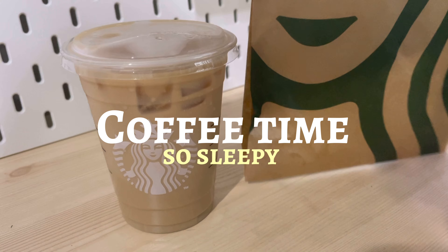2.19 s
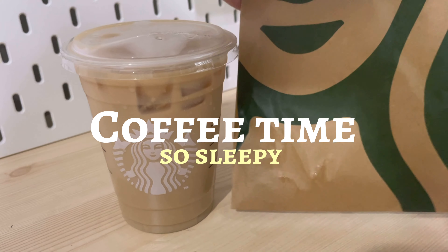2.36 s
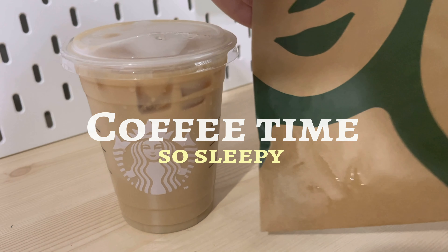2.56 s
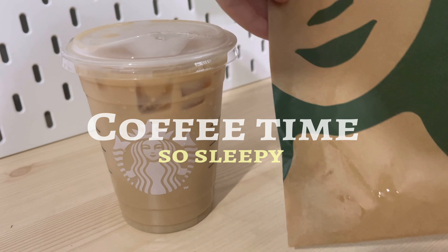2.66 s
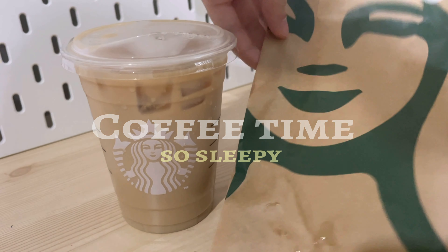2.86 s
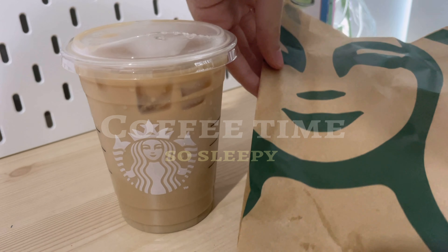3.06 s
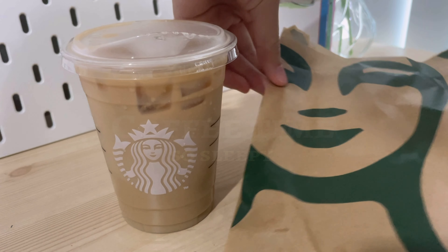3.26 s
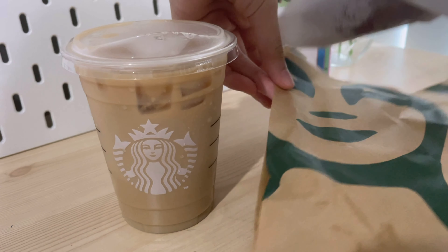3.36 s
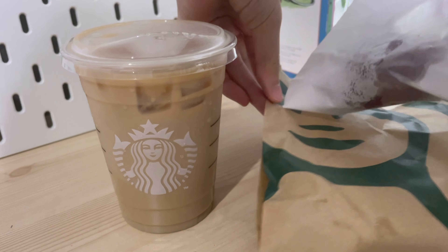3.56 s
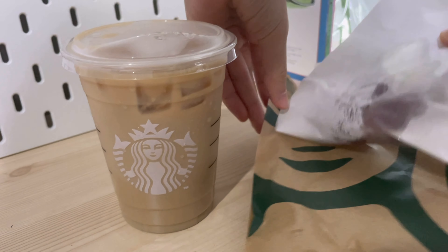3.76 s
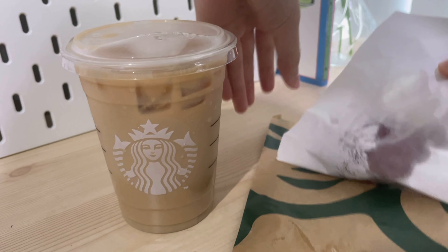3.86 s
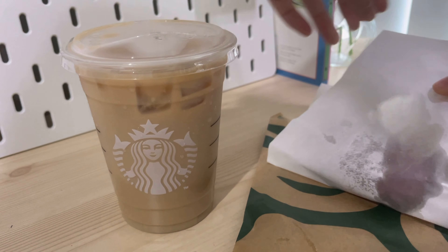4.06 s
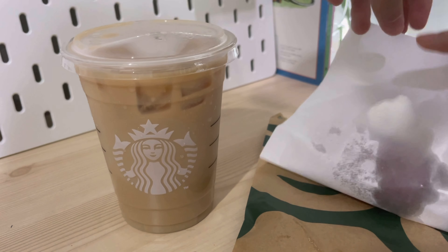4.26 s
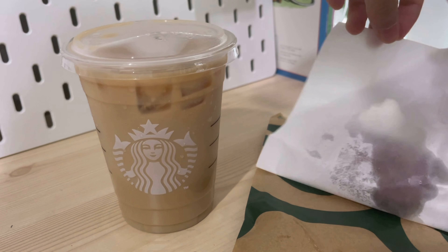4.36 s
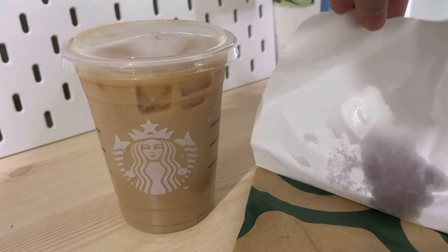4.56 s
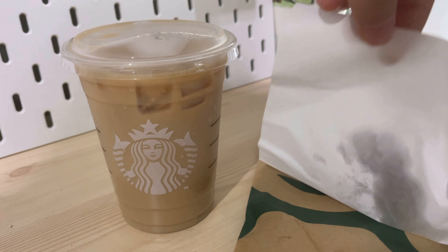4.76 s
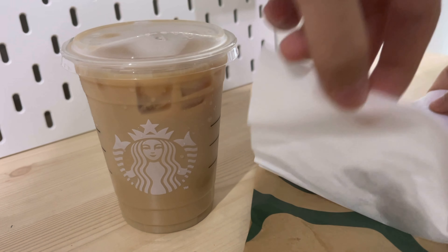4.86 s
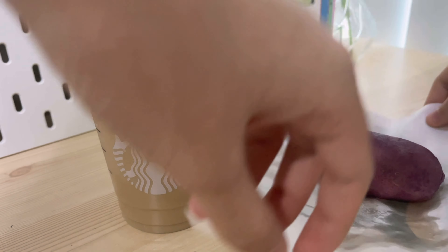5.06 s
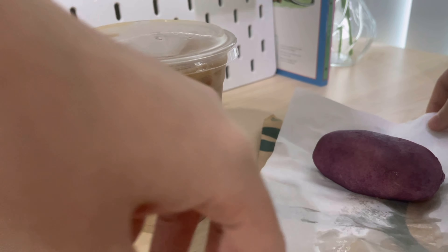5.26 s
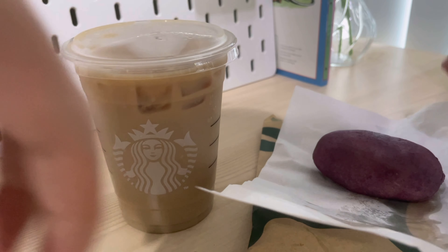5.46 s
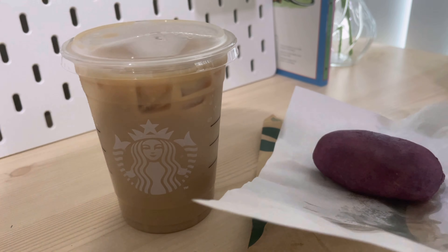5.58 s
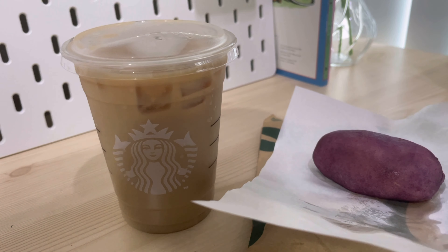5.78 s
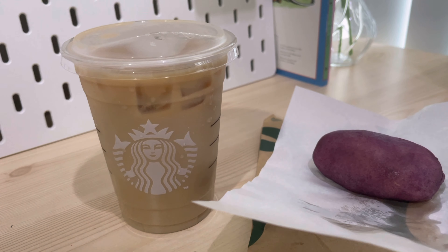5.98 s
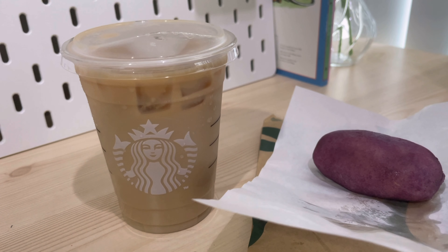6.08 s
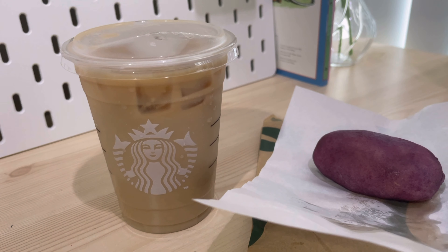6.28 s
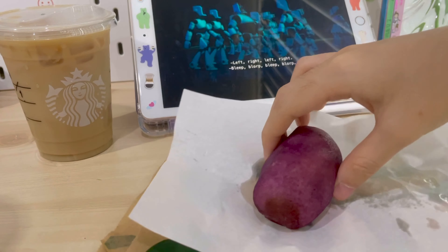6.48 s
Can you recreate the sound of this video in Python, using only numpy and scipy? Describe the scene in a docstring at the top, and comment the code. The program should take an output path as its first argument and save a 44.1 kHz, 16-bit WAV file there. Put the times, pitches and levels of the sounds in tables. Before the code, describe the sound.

A quiet indoor room with a low wavering hum, faint dull rustles and a small tap, dips briefly to silence. Then a paper bag and thin wrapper are handled on a wooden desk: dense sharp crackles, snapping creases and a few soft thumps. The handling turns lighter and patchier, then stops, leaving faint hush and a second tiny dip near the end. Very close stereo microphone, small dry room.

```python
"""Paper bag and wrapper on a desk

A paper bag and a thin wrapper are handled on a wooden desk, close to two microphone ports.
Creases snap, small folds ring and panels pop over a dense crackle of noise shaped by random buckles.
Soft sagging tones thump the desk, a wavering low tone hums and swells in it, short noise tails answer as a room.
A hush with duller swells of noise lies behind; the whole level dips to silence twice."""
import sys
import numpy as np
from scipy import signal
from scipy.fft import rfft, irfft, next_fast_len
from scipy.io import wavfile
from scipy.ndimage import uniform_filter1d, map_coordinates

SR = 44100
rng = np.random.default_rng(int(sys.argv[2]) if len(sys.argv) > 2 else 0)


def wav_out(sig):
    """Save sig, one row per channel (or a flat mono array), as 16-bit PCM at SR to the path in sys.argv[1]."""
    wavfile.write(sys.argv[1], SR, np.round(np.clip(np.atleast_2d(sig).T, -1, 1) * 32767).astype(np.int16))


N = 287513

# Colour of the bright paper crackle. Each row: frequency in Hz, relative level in dB.
CRACKLE_COLOUR = [(400, -31.5), (1000, -4), (2000, -1.5), (4500, -1), (6000, -6), (8000, -3), (11500, -6.5),
                  (14500, -7)]
# Colour of the duller flapping body of the sheet. Each row: frequency in Hz, relative level in dB.
BODY_COLOUR = [(35, -22.5), (70, 0.5), (120, 0), (330, 4), (520, 2), (620, -3), (950, 0), (2000, -21)]
# Dips to silence. Each row: middle in seconds, silence on each side of it in seconds.
DIPS = [(0.898, 0.0087), (6.428, 0.0078)]


def amp(db):
    """dB to gain."""
    return 10 ** (np.asarray(db) / 20)


def unit(x):
    """Scaled to rms 1."""
    return x / np.sqrt(np.mean(x ** 2) + 1e-20)


def even(x):
    """x without its slow changes of level."""
    return x / np.sqrt(abs(uniform_filter1d(x ** 2, size=300)) + 1e-20)


def along(points, hz):
    """Values at hz, from (Hz, value) points joined on a log frequency axis."""
    f, v = np.transpose(points)
    return np.interp(np.log(hz + 1), np.log(f + 1), v)


def curves(rows):
    """One value per sample for each column after the time."""
    s, *cols = np.transpose(rows)
    return [np.interp(np.arange(N) / SR, s, c) for c in cols]


def wobble(rate):
    """A smooth random curve, rate knots a second."""
    knots = rng.standard_normal(int(N * rate / SR) + 4)
    return map_coordinates(knots, [np.arange(N) * rate / SR])


def filtered(x, response):
    """x times a complex response of frequency."""
    m = next_fast_len(N + SR // 2)
    spectrum = rfft(x, m) * response(np.fft.rfftfreq(m, 1 / SR))
    return irfft(spectrum, m)[..., :N]


def noise(colour, patchy_db):
    """Noise of rms 1 whose colour shifts at random in small patches of time and frequency."""
    z = signal.stft(rng.standard_normal(N), nperseg=256)[2]
    field = rng.standard_normal(z.shape)
    field = uniform_filter1d(field, size=7, axis=0)  # smooth over frequency
    field = uniform_filter1d(field, size=5, axis=1)  # smooth over time
    patchy = signal.istft(z * amp(patchy_db * unit(field)), nperseg=256)[1][:N]
    return unit(filtered(patchy, lambda hz: amp(along(colour, hz))))


def diffuse(colour):
    """Noise from all around: alike at both ports in the bass only."""
    # Each row: frequency in Hz, likeness of the two ports from 0 to 1.
    likeness = [(60, 1), (300, 0.3), (1400, 0)]

    def mid_side(hz):
        turn = np.arccos(np.clip(along(likeness, hz), -1, 1)) / 2
        return amp(along(colour, hz)) * [np.cos(turn), np.sin(turn)]

    mid, side = filtered(rng.standard_normal((2, N)), mid_side)
    return unit(np.array([mid + side, mid - side]))


def bursts(blows, rise, t60):
    """Envelope that climbs 60 dB in rise seconds to a peak just after every blow, then decays."""
    peak_s = 0.0012  # delay of the peak
    t = np.arange(-SR // 8, SR // 8) / SR - peak_s
    shape = amp(-60 * np.maximum(-t / rise, t / t60))
    return signal.fftconvolve(blows, shape, mode="same")


def swells(rows, rise_db_per_s, fall_db_per_s):
    """Gain of overlapping (start, held seconds, dB) swells: a rise up to the start, a hold, a fall."""
    t = np.arange(0, N, 32) / SR
    power = 0
    for s, held, db in rows:
        before, after = np.maximum(s - t, 0), np.maximum(t - s - abs(held), 0)
        power = power + amp(db - rise_db_per_s * before - fall_db_per_s * after) ** 2
    return np.interp(np.arange(N) / SR, t, np.sqrt(power))


def pings(s, db, hz, cycles):
    """Damped sines, one per entry, that lose 60 dB in so many cycles."""
    k = np.arange(SR // 30)
    turns = np.outer(hz, k / SR)
    decay = amp(np.asarray(db)[:, None] - 60 * turns / cycles)
    rings = decay * (1 - np.exp(-2 * turns)) * np.sin(2 * np.pi * turns)
    places = np.round(np.asarray(s) * SR).astype(int)[:, None] + k
    return np.bincount(places.ravel(), rings.ravel(), N + SR)[:N]


def rustle():
    """The moving sheet: crackle on a flickering hiss, ringing folds, and the duller flap of its body."""
    # How much the sheet flaps. Each row: time in seconds, body level in dB against the crackle.
    flap = [(1, -4), (2.8, -8.5), (3.2, -4.5), (3.9, -9), (4.3, 0.5), (5.2, -8.5)]
    folds_db = -10  # against the crackle
    buckles = unit(crackle(rate=380, spread_db=3.0, clump_db=1.0))
    bright_envelope = 0.59 * buckles + 0.6 * amp(1.5 * wobble(60))
    bright = unit(bright_envelope * noise(CRACKLE_COLOUR, patchy_db=2.5))
    body_envelope = 0.38 * buckles + 0.55 * amp(2.6 * wobble(25))
    body = unit(body_envelope * noise(BODY_COLOUR, patchy_db=3.0))
    return handling() * (bright + amp(folds_db) * folds() + amp(curves(flap)[0]) * body)


def handling():
    """Gain of the rustle: moves that begin before the first dip end there, later ones take over."""
    # Pulls and squeezes of the paper. Each row: start in seconds, held time in seconds, gain in dB.
    moves = [(0, 0.039, -76.5), (0, .85, -97.5), (.636, 0.0088, -83.5), (.96, 1.91, -51.5),
             (0.968, 0.01, -46.5), (1.07, 0.025, -53), (1.489, 0.008, -44.5), (1.62, 0.071, -46.5),
             (1.895, 0.17, -45.5), (2.191, 0.097, -46.5), (2.39, 0.12, -49), (2.89, 0.014, -57.5),
             (2.95, 0.029, -72.5), (3.07, 0.084, -69.5), (3.267, 0.025, -57.5), (3.39, 0.011, -65.5),
             (3.504, 0.18, -61.5), (3.75, 0.084, -65.5), (3.83, 0.19, -54.5), (3.905, 0.027, -51.5),
             (4.09, 0.066, -63), (4.25, 0.09, -69.5), (4.442, 0.028, -62.5), (4.65, 0.065, -61),
             (4.77, 0.17, -70.5), (4.92, 0.072, -64), (5.02, 0.036, -64.5), (5.14, 0.032, -61.5),
             (5.23, 0.036, -63.5), (5.33, 0.081, -67.5), (6.5, .03, -65)]
    grip_db_per_s, let_go_db_per_s = 261.5, 321.5  # speed of rise and fall
    turnover = DIPS[0][0]
    first = [row for row in moves if row[0] < turnover]
    later = [row for row in moves if row[0] >= turnover]
    first_gain = swells(first, grip_db_per_s, let_go_db_per_s)
    later_gain = swells(later, grip_db_per_s, let_go_db_per_s)
    return np.where(np.arange(N) / SR < turnover, first_gain, later_gain)


def crackle(rate, spread_db, clump_db):
    """Envelope of countless small buckles in clumps, a few much larger than the rest."""
    draw = rng.random((2, N))
    odds = rate / SR * amp(clump_db * wobble(35))
    blows = (draw[0] < odds) * amp(-spread_db * np.log(draw[1] + 0.007))
    return bursts(blows, rise=0.006, t60=0.014)


def folds():
    """Small folds flip at random moments and ring for a few cycles, each at its own pitch."""
    folds_per_s, middle_hz, spread_octaves = 220, 2970, 0.891
    draw = rng.random((2500, 2))
    s = np.cumsum(-np.log(1 - draw[:, 0])) / folds_per_s
    hz = middle_hz * 2 ** (spread_octaves * rng.standard_normal(len(s)))
    hz = np.clip(hz, 700, 12000)
    db = -3 * np.log(draw[:, 1] + 0.044)
    keep = s < N / SR
    return unit(pings(s[keep], db[keep], hz[keep], cycles=30))


def snaps():
    """Each buckle is a ragged burst with a weak after-crack: crack, air above it, a slower flap of the body."""
    # Creases that buckle one by one.
    # Each row: start in seconds, crack level in dB, air in dB against the crack before the air's own lift.
    creases = [(0.0458, -62, -4), (.578, -77.5, 0), (0.6298, -63, -0.5), (0.949, -51.5, 0.5),
               (1.0382, -33, 0), (1.059, -38, -12), (1.0782, -35, -0.5), (1.101, -45.5, -1),
               (1.115, -43, 4), (1.123, -37.5, 3.5), (1.148, -40, 1.5), (1.186, -46, -5), (1.197, -45, -3),
               (1.246, -44.5, -7), (1.3067, -40.5, -3), (1.319, -48, 5), (1.352, -39, -15), (1.41, -56, 10),
               (1.4342, -41.5, -9), (1.459, -46.5, 11.5), (1.5818, -45, -1.5), (1.7501, -32.5, -3.5),
               (1.762, -41, -3.5), (1.7726, -37.5, -1), (1.8304, -36.5, -1.5), (1.8803, -31.5, -3),
               (1.9074, -40, -4), (1.935, -46, 0), (1.955, -46.5, -16), (1.967, -42.5, 2.5),
               (1.989, -38, -7), (2.011, -37, 1), (2.0615, -45, -17), (2.0774, -48.5, -9), (2.109, -46, -2),
               (2.194, -44, -5.5), (2.214, -40.5, -3), (2.2638, -40, -7), (2.2997, -49.5, -2),
               (2.358, -46.5, 2.5), (2.3999, -44, -3), (2.4294, -45.5, -1), (2.4503, -56, 0.5),
               (2.4818, -50, -7), (2.4954, -43, -4.5), (2.5819, -40, 0), (2.592, -43.5, -1),
               (2.6449, -36.5, 1.5), (2.7318, -48.5, 10), (2.851, -41, -1.5), (2.878, -41, 3),
               (3.0451, -55, -27), (3.076, -49, -4), (3.1155, -51, -12), (3.2276, -54, 5), (3.309, -44, -7),
               (3.395, -53, -7), (3.412, -53, 1), (3.5023, -58, 0), (3.6351, -42.5, -4), (3.729, -50, -6.5),
               (3.741, -48.5, 0.5), (3.7757, -48, 8), (3.843, -36.5, 4.5), (3.8736, -45, 0),
               (3.9145, -42.5, -6.5), (3.9424, -40, -6), (3.997, -46.5, -1.5), (4.1148, -56, -2),
               (4.1504, -54, -19), (4.2432, -56, -5), (4.378, -56.5, -19), (4.415, -57.5, -3),
               (4.4704, -45, -1.5), (4.5593, -52.5, 0.5), (4.634, -66, 17), (4.647, -49.5, -25),
               (4.725, -46.5, 1), (4.7653, -54.5, -13), (4.791, -52, -3), (4.8524, -46, 2.5),
               (4.9505, -48, -3), (4.9674, -50, 8), (5.0163, -47, 4), (5.038, -47, -11), (5.074, -43.5, 6),
               (5.094, -57, 0), (5.134, -57, -17), (5.153, -51, -12), (5.185, -61, -2), (5.2499, -47.5, 1),
               (5.28, -59, 2), (5.294, -56.5, 3.5), (5.3664, -59.5, 8), (5.3984, -53, -8)]
    # Each row: frequency in Hz, relative level in dB.
    air_colour = [(5000, -36), (9000, -2.5), (11000, -0.5), (15000, -2.5)]
    after_s, after_db = 0.018, -13.5  # latest after-crack, its level against the snap
    air_lift_db, body_db = 1.5, -14.5
    blows = np.zeros((2, N))  # crack, air
    for (s, db, air_db), late in zip(creases, rng.random(len(creases))):
        for delay, drop_db in ((0, 0), (after_s * late, after_db)):
            blows[:, round((s + delay) * SR)] += amp(np.array([db, db + air_db]) + drop_db)
    ragged = unit(amp(2.4 * wobble(900)))
    crack_colour = CRACKLE_COLOUR[:5] + [(9000, -0.5), (12000, -20.5)]
    crack = bursts(blows[0], rise=0.0096, t60=0.025) * even(noise(crack_colour, patchy_db=3.2))
    air = bursts(blows[1], rise=0.003, t60=0.016) * even(noise(air_colour, patchy_db=2.0))
    body = bursts(blows[0], rise=0.035, t60=0.055) * noise(BODY_COLOUR, patchy_db=3.0)
    return ragged * (crack + amp(air_lift_db) * air) + amp(body_db) * body


def pops():
    """Panels of paper pop with a dull note, and one tap: each rings a close cluster around its pitch."""
    # Each row: start in seconds, level of each ring in dB, central pitch in Hz.
    panels = [(.09, -56, 855), (.175, -57, 1040), (.631, -52, 1414), (.972, -43.5, 1180), (3.228, -63, 660),
              (3.275, -60.5, 487), (3.29, -71, 880), (3.308, -53, 666), (3.383, -62.5, 597),
              (3.582, -52.5, 730)]
    s, db, hz = np.repeat(panels, 3, axis=0).T  # three rings a pop
    draw = rng.standard_normal((len(s), 2))
    return pings(s + 0.0016 * abs(draw[:, 0]), db, hz * (1 + 0.19 * draw[:, 1]), cycles=34)


def thumps():
    """A soft blow on the desk: a few low cycles whose pitch sags."""
    # Bag and food set down on the desk. Each row: start in seconds, level in dB before the lift,
    # pitch it settles to in Hz, starting pitch as a multiple of that.
    set_downs = [(1.508, -43, 343, 1.2), (1.992, -35, 303, 1.2), (2.871, -35.5, 100.5, 2.4),
                 (3.575, -40.5, 337, 1.3)]
    lift_db = 4.5
    out, t = np.zeros(N + SR), np.arange(SR // 5) / SR
    for s, db, hz, start in set_downs:
        cycles = np.cumsum(hz * (1 + (start - 1) * np.exp(-t / 0.00776))) / SR
        decay = amp(db + lift_db - 60 * cycles / 8)  # loses 60 dB in 8 cycles
        attack = 1 - np.exp(-t / 0.003)
        out[round(s * SR):][:len(t)] += decay * attack * np.sin(2 * np.pi * cycles)
    return out[:N]


def walls(x):
    """Echoes of the room and, shorter, of cup and desk: noise tails whose treble dies first."""
    # Each row: frequency in Hz, room decay by 60 dB in seconds (the second tail takes half).
    decay_times = [(100, 0.3), (1000, 0.17), (8000, 0.05)]
    out, step = np.zeros((2, N + SR)), SR // 5
    for start in range(0, N, step):  # the paper moves, so the tails are new every fifth of a second
        hz, t, z = signal.stft(rng.standard_normal((2, SR // 5)), SR, nperseg=128)
        t60 = along(decay_times, hz)[:, None] * [[[1]], [[.5]]]
        tail = signal.istft(z * amp(-60 * t / t60), SR, nperseg=128)[1]
        tail = tail / np.linalg.norm(tail, axis=1, keepdims=True)
        echo = signal.fftconvolve(x[None, start:start + step], tail, axes=1)
        out[:, start:start + echo.shape[1]] += echo
    return out[:, :N]


def ports(pair):
    """Near sound reaches the two ports with unequal strength and phase."""
    # Each row: frequency in Hz, left over right in dB.
    louder_left = [(380, -0.5), (700, 1.5), (5500, 2.5), (9000, 0)]
    # Each row: frequency in Hz, phase by which the left port leads in radians.
    phase_lead = [(2000, .1), (3400, .8), (4800, .7), (5500, 0), (6200, -1.3), (6900, -1.5), (7600, -2.6),
                  (8400, -3.14), (11700, -5.1), (13100, -6.2), (16400, -6.3)]
    side = np.array([[.5], [-.5]])  # half the difference to each port

    def response(hz):
        return amp(side * along(louder_left, hz)) * np.exp(1j * side * along(phase_lead, hz))

    return filtered(pair, response)


def desk():
    """The lowest mode of the desk: a wavering tone in a little rumble."""
    # Steady low hum at the opening, then jolts that set the desk shaking.
    # Each row: start in seconds, held time in seconds, gain in dB.
    hum_and_jolts = [(0, .83, -51.5), (1.1, 0.11, -58), (1.51, .01, -57), (1.66, 0.13, -65),
                     (1.89, .01, -59), (2.28, .01, -60), (2.64, 0.023, -59), (2.885, 0.0076, -60),
                     (3.63, 0.067, -51), (3.92, .03, -54.5), (4.5, 0.0091, -62.5), (4.66, 0.03, -62.5)]
    # Each row: frequency in Hz, relative level in dB.
    rumble_colour = [(20, -39.5), (40, -18.5), (54, 6), (70, 5.5), (110, -64.5)]
    idle_db = -71  # the desk never quite rests
    hz = 53 * (1 + 0.11 * wobble(9.7))
    tone = np.sqrt(2) * np.sin(2 * np.pi * np.cumsum(hz) / SR) * amp(1.6 * wobble(3.2))
    level = swells(hum_and_jolts, rise_db_per_s=201.5, fall_db_per_s=202.5)
    return np.hypot(amp(idle_db), level) * (0.85 * tone + 0.35 * diffuse(rumble_colour))


def room_tone():
    """A gently wavering hush of air, and swells of duller noise for far rustles and the tail of a tap."""
    # Hush of the room. Each row: time in seconds, level in dB.
    hush_level = [(0, -58.5), (.88, -65), (.92, -65.5), (6.52, -72.5)]
    # Far rustles, and the dull tail of the tap at 0.63 s.
    # Each row: start in seconds, held time in seconds, gain in dB.
    dull_swells = [(0, .005, -69), (.088, 0.093, -62.5), (.2, 0.092, -65.5), (.632, 0.024, -64),
                   (5.735, .08, -80.5)]
    # Colours of the hush and of the dull swells. Each row: frequency in Hz, relative level in dB.
    hush_colour = [(35, -26), (60, -6.5), (81, -7.5), (151, -7.5), (178, -18), (263, -17.5), (1600, -38),
                   (2200, -46), (15000, -70)]
    dull_colour = [(120, -12.5), (220, 3), (1500, -10.5), (2300, -18.5), (5000, -33), (15000, -72)]
    dull = swells(dull_swells, rise_db_per_s=1504, fall_db_per_s=127) * amp(1.5 * wobble(25))
    hush = amp(curves(hush_level)[0] + 1.5 * wobble(7))
    return hush * diffuse(hush_colour) + dull * diffuse(dull_colour)


def fades():
    """Gain of the dips: down to silence, a moment of nothing, up again."""
    fade_out_s, fade_in_s, fade_power = 0.087, 0.081, 1.35
    t = np.arange(N) / SR
    gain = np.ones(N)
    for s, dead in DIPS:
        down, up = (s - dead - t) / fade_out_s, (t - s - dead) / fade_in_s
        gain *= np.clip(np.maximum(down, up), 0, 1)
    return gain ** fade_power


def scene():
    """Near paper and thumps with their echoes, over the humming, shaking desk and the room tone."""
    # Echoes that differ between the ports. Each row: frequency in Hz, level in dB.
    scatter = [(100, -13.5), (300, -18), (700, -9), (4100, -9), (5500, -3), (7200, -1), (8500, -17.5),
               (11000, -7), (14000, -19.5)]
    near = rustle() + snaps() + pops() + thumps()
    shared, apart = walls(near)
    apart = filtered(apart, lambda hz: amp(along(scatter, hz)))
    return ports(near + amp(-13.5) * shared + [apart, -apart]) + desk() + room_tone()


def record(dry):
    """The level dips to silence and returns; the top of the treble ends in two steep steps."""
    roll_hz, top_hz = 15750, 16650  # middles of the two steps
    edges = [roll_hz - 120, roll_hz + 120, top_hz - 150, top_hz + 150]
    return filtered(dry * fades(), lambda hz: amp(np.interp(hz, edges, [1, -29, -29.5, -100])))


dry = scene()
out = record(dry)
wav_out(out)
```